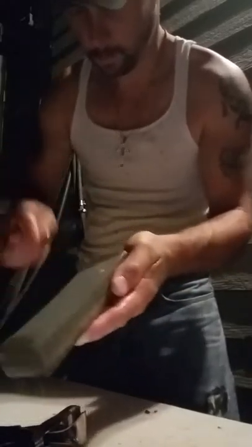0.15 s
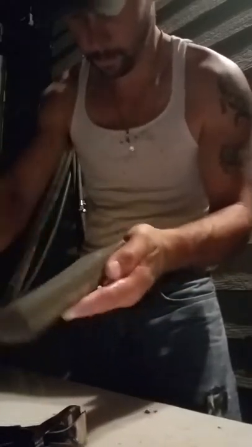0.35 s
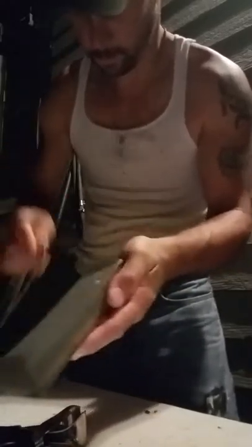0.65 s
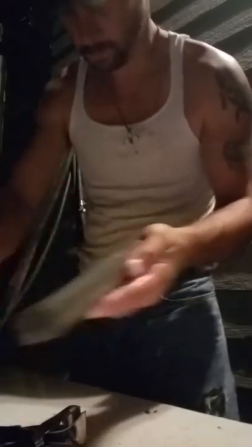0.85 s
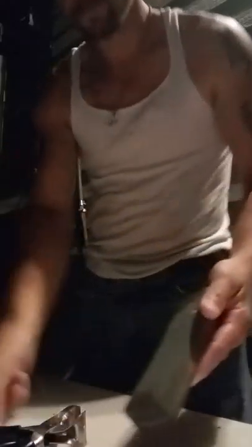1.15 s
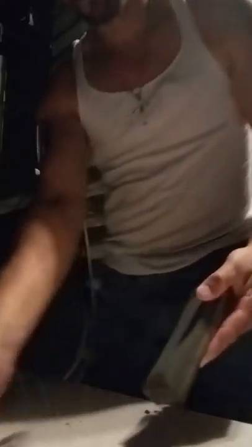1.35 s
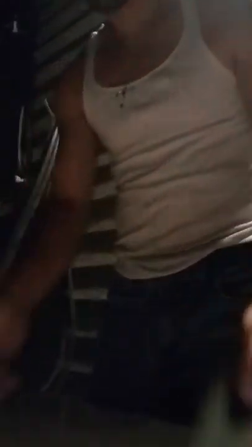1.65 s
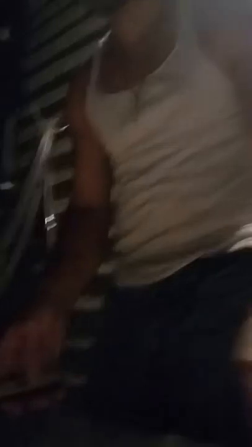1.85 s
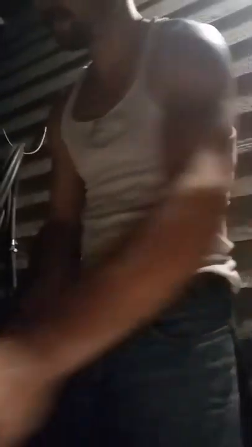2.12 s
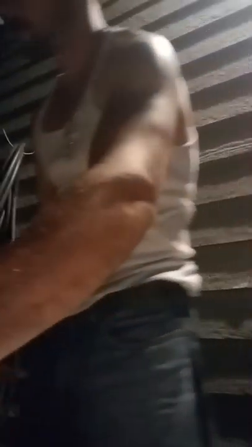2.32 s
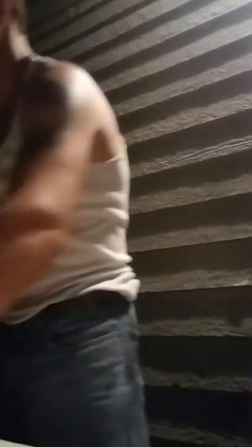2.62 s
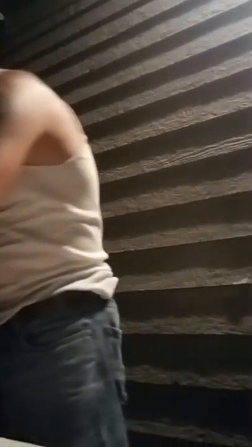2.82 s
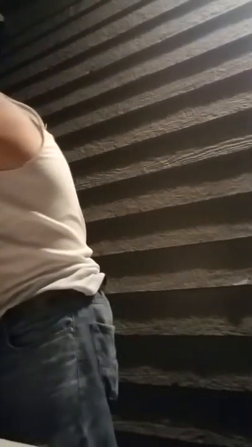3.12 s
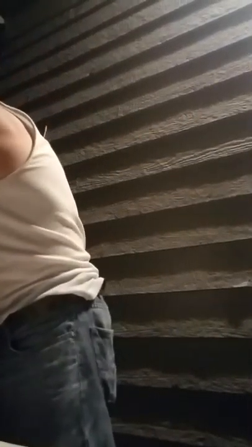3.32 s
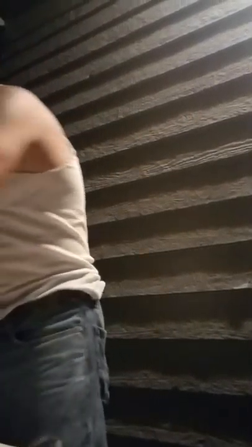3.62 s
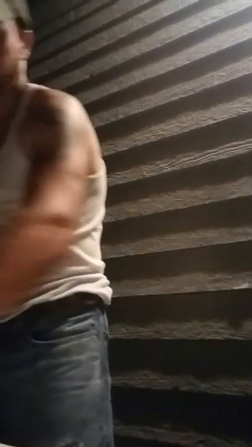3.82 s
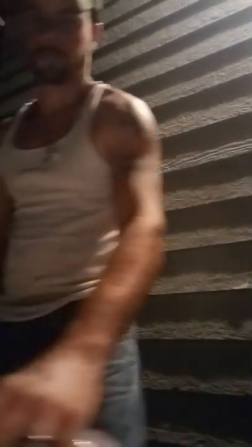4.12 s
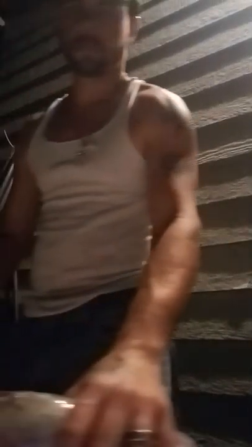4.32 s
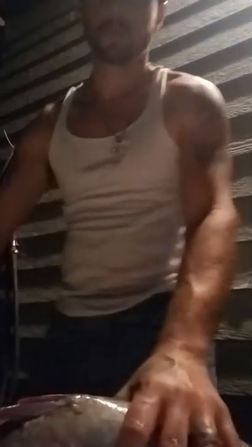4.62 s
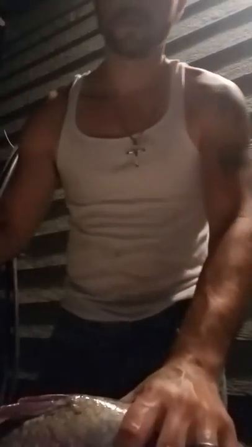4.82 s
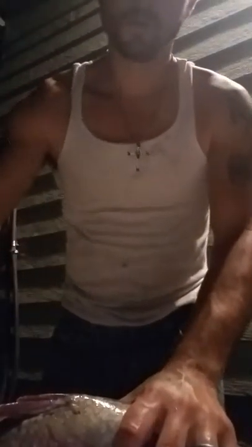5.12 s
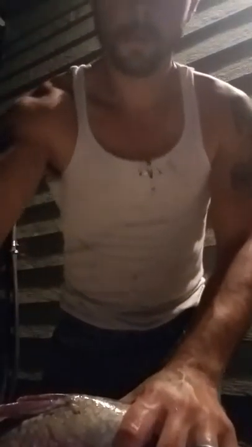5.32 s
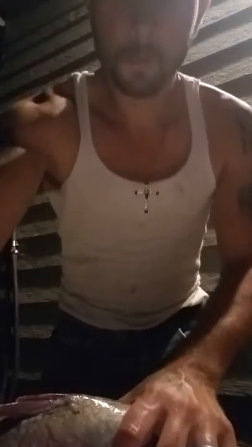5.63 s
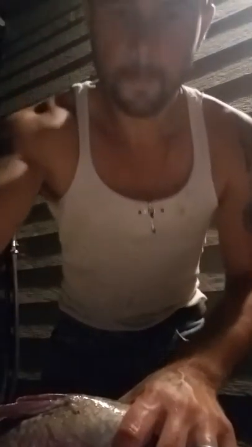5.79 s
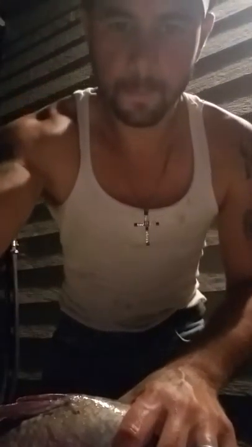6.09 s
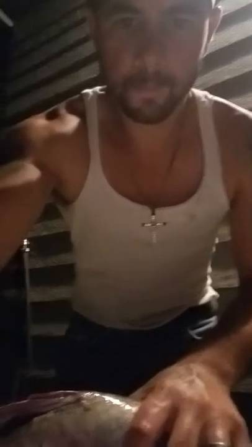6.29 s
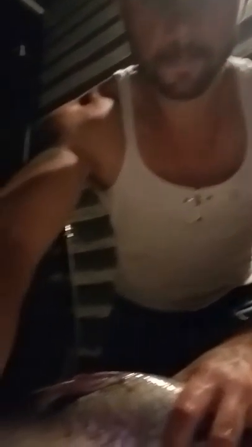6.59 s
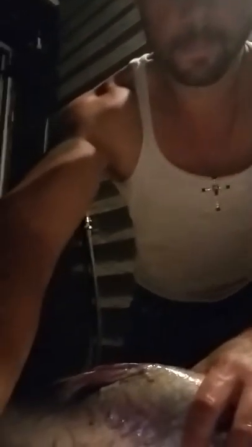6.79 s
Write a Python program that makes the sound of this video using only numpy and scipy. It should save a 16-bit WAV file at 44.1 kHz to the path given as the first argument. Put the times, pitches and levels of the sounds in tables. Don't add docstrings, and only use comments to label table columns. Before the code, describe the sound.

A porch at night, heard by a phone close to the action, mostly to its right, with dense shimmering insects over a low far machine hum. At about 0.1, 0.4, 0.6 and 0.9 s a knife takes four quick gritty strokes on a stone, each with a sharp landing and a steely hiss, the later ones louder. From 1.2 to 2.0 s knife and stone drop on a hollow plastic table: booming knocks, strongest near 1.5, 1.75 and 1.9, with rattles, hard ticks and short ringing skids. The insects duck, then recover by 3. From 2.4 to 3.3 a plastic lid shudders, scrapes and hums, crackling. A soft knock at 3.5; from 3.6 to 4.5 a wet fish drags raspily in jerks, snapping around 4.0 to 4.3. A loud slap at 4.78 rattles briefly. The night dips, then swells; faint wet finger ticks, sliding palms and small clicks near 6.5 end it at 7.

```python
import sys
import numpy as np
from scipy import signal
from scipy.fft import rfft, irfft, next_fast_len
from scipy.io import wavfile
from scipy.ndimage import uniform_filter1d, map_coordinates

SR = 44100
rng = np.random.default_rng(int(sys.argv[2]) if len(sys.argv) > 2 else 0)


def boost_factor(decibels):
    exponent = np.asarray(decibels, float) / 20
    return 10 ** exponent


def int16_out(signal):
    q = np.round(np.clip(np.atleast_2d(signal).T, -1, 1) * 32767)
    wavfile.write(sys.argv[1], SR, q.astype(np.int16))


N = 306495

# t/s, level/dB
NIGHT_LEVEL = [(0, -45.5), (.75, -42.5), (.95, -45.5), (1.45, -45.5), (1.9, -55.5), (2.4, -56.5),
               (2.75, -49), (2.95, -39.5), (4.7, -39), (4.99, -48), (5.2, -50), (5.6, -43.5), (5.9, -41.5),
               (6.58, -38.5), (6.95, -40)]
# f/Hz, density/dB per Hz
CHORUS_COLOUR = [(410, -17.5), (800, -4), (1210, -7), (1640, -11.5), (2350, 0.5), (2650, -6.5),
                 (3130, -1.5), (3690, -15.5), (4660, -9), (5600, -11.5), (7280, -39), (12300, -120)]
# f/Hz, density/dB per Hz
TRILL_COLOUR = [(3240, -44), (5500, -34), (5830, -11.5), (6150, -3.5), (6430, 7), (6720, -1), (7130, -20),
                (7290, -18.5), (8870, -17.5), (10300, -30.5), (15200, -21.5), (16000, -13)]
# f/Hz, density/dB per Hz
HUM_COLOUR = [(15, -50), (35, -22), (54, 9), (124, 2), (199, -6.5), (300, -3), (387, -9), (514, -5),
              (632, -13.5), (1100, -28.5), (2420, -100)]
# f/Hz, likeness/0..1
NIGHT_ALIKE = [(60, 0.97), (600, 0.99), (1000, 0.59), (1400, .03)]
NEAR_ALIKE = [(35, 0.84), (80, 0.75), (250, 0.84), (500, 0.54), (1000, 0.14), (2000, 0.019)]
# f/Hz, level/dB
NIGHT_SIDE = [(100, -0.5), (400, -3), (1800, -5), (3500, -3.5), (5000, -5), (6500, -7.5), (8500, -13.5),
              (11000, 4), (15000, -7.5)]
NEAR_SIDE = [(100, -2.5), (200, -5.5), (400, -9), (800, -7.5), (1500, -13), (3500, -7.5), (6500, -12.5),
             (8500, -21), (11000, -3.5), (15000, -14)]
BLADE_SIDE = [(800, -11), (1500, 3), (3500, -3.5), (6500, -5.5), (8500, -13.5), (11000, -1.5), (15000, -14)]
# f/Hz, t60/s
PORCH_DECAY = [(200, 0.38), (2000, 0.024), (10000, 0.038)]
# f/Hz, width/Hz, level/dB
HOUSING = [(7970, 390, 16), (15300, 1700, -11)]

# t/s, length/s, level/dB, swell/dB, sizzle at top speed/dB
STROKES = [
    (0.112, 0.089, -39.5, -1.5, 3),
    (0.371, 0.061, -39, 2.5, 13),
    (0.625, 0.081, -34, -4, -23),
    (0.871, 0.034, -31.5, 7, 9),
]
# t/s, peak/dB, brightness/dB, ring f/Hz
TOUCHES = [
    (0.1145, -16, -4, 3710),
    (0.3745, -15.5, 5, 2740),
    (0.626, -15.5, 3, 4200),
    (0.868, -13, 0, 3680),
]
# f/Hz, density/dB per Hz
BLADE_COLOUR = [(350, -28), (900, -17.5), (1400, -22), (2500, -16.5), (3300, -5), (5120, -8.5),
                (6200, -1.5), (7310, -10), (8390, 2.5), (10700, -8), (12500, -9), (14900, -8.5),
                (16000, -2.5)]
# f/Hz, width/Hz, level/dB
STEEL = [(4200, 61, -10), (5760, 18, -4), (8200, 47, -14), (11340, 40, 3), (15460, 290, 13)]
STROKE_BANDS = [0, -1, 0, 0]
SIZZLE_SHARE = np.array([0.25, 0.1, 0.21, 1.0])

# t/s, length/s, boom/dB, sag/dB, step a band up/dB
RATTLES = [(1.166, 0.11, -40, -2.5, -7), (1.285, 0.033, -20.5, -2, -15), (1.314, 0.059, -21.5, -10, -10),
           (1.499, 0.077, -10, -12.5, -11.5), (1.571, 0.12, -22.5, -12, -6),
           (1.69, 0.039, -31.5, -3, -12.5), (1.751, 0.093, -19.5, -27, -9), (1.772, 0.022, -28.5, 2, -4),
           (1.808, 0.038, -32, -3.5, -5), (1.911, 0.01, -12.5, -25, -7),
           (1.932, 0.052, -10.5, -13.5, -12.5), (2.0, 0.031, -29, -15, -7), (3.495, 0.027, -23, -2, -11.5),
           (3.52, 0.15, -27.5, -18, -24), (4.779, 0.054, -15, -20, -5.5), (4.846, 0.035, -19, -2.5, -10),
           (4.901, 0.014, -22.5, -4, -8.5)]
# t/s, peak/dB, own ring f/Hz
THUDS = [(1.177, -8, 102), (1.282, -3.5, 138), (1.313, -0.5, 167), (1.4975, 1, 240), (1.502, -4, 150),
         (1.506, -7, 314), (1.536, -2, 425), (1.566, -8, 318), (1.749, 3, 157), (1.774, -10, 241),
         (1.846, -6, 100), (1.91, 6.5, 161), (1.93, -1, 164), (1.947, -1, 199), (1.96, -4, 150),
         (1.984, -9, 176), (2.307, -24, 105), (2.333, -15, 103), (3.493, -10.5, 190), (3.5, -14, 450),
         (3.515, -15, 172), (3.53, -11, 120), (3.555, -14, 86), (4.215, -15, 215), (4.319, -15, 187),
         (4.779, 3.5, 702), (4.786, -7, 566), (4.794, -9, 150), (4.803, -10, 131), (4.812, -14, 180),
         (4.833, -10, 110), (4.845, -7, 474), (4.864, -15, 275), (4.9, -11, 320), (4.925, -16, 200),
         (4.947, -17.5, 149)]
# t/s, peak/dB, brightness/dB, ring f/Hz
TICKS = [(1.3142, -30.5, -65, 1580), (1.4998, -7, -6, 2600), (1.5062, -17, 0, 2460),
         (1.533, -35, -10, 2550), (1.5385, -13, -7, 2500), (1.5672, -21, 3, 1620), (1.582, -36, -12, 1500),
         (1.592, -24, -3, 1530), (1.6225, -33, -1, 3100), (1.737, -38, 8, 1900), (1.299, -38, 8, 1500),
         (1.7505, -21, -13, 1780), (1.7715, -35, -8, 2710), (1.799, -24, -12, 2200), (1.808, -31, 0, 2800),
         (1.8427, -22, -9, 1500), (1.9098, -10, -23, 1850), (1.932, -16, -8, 2960),
         (1.9383, -11.5, -16, 2400), (1.951, -26, -12, 2500), (1.9728, -14, 0, 1930),
         (1.983, -22, -7, 2600), (1.9845, -21.5, 8, 2600), (2.0015, -20.5, -9, 2500),
         (2.005, -22, -10.5, 2400), (2.0275, -25, -4, 2400), (2.031, -20, -4, 2470),
         (2.0375, -19, -15, 2550), (2.3063, -32, -8, 2240), (2.3393, -18.5, -1.5, 2560)]
# f/Hz, density/dB per Hz
TABLE_COLOUR = [(18, -47), (30, -12), (81, -1), (162, -4.5), (229, -3.5), (421, -7), (1770, -12.5),
                (2200, -39), (4840, -95)]
# f/Hz, width/Hz, level/dB
HOLLOW = [(69, 30, 0), (146, 120, -4.5), (240, 38, -2.5), (307, 30, 0.5), (450, 61, 0.5), (583, 58, -3),
          (730, 280, -17)]
# f/Hz, density/dB per Hz
SKID_COLOUR = [(1240, -41), (2100, -3.5), (2580, 5), (3210, -6.5), (3500, -9.5), (4720, 0), (5580, -24),
               (8210, -17), (11000, -46), (15000, -33)]
# f/Hz, width/Hz, level/dB
BLADE_FLAT = [(2770, 37, -14.5), (3260, 220, 0)]
# t/s, f/Hz, level/dB
BLADE_SONG = [
    [(1.5, 3000, -47), (1.54, 3100, -46), (1.6, 3200, -44.5), (1.66, 3250, -46), (1.7, 3250, -67)],
    [(1.57, 1500, -47), (1.61, 1530, -36), (1.64, 1530, -60), (1.7, 1500, -57)],
    [(1.765, 2750, -57), (1.785, 2750, -35), (1.805, 2750, -50), (1.815, 2750, -39), (1.845, 2750, -59)],
]
# f/Hz, level/dB, t60/s
TIP = [(3710, 2, 0.013), (5880, -12, 0.018), (8040, -26, .014), (12000, -21, 0.01)]
# t/s, level/dB
TIP_TAPS = [
    (1.8427, -7),
    (1.845, -8),
]
# t/s, drone/dB
SHIFT = [
    (5.15, -76),
    (5.4, -78),
    (5.41, -91),
    (5.57, -54),
    (6.834, -52.5),
    (6.95, -66),
]
BAND_STEP, BAND_SAG = [0, 0.8, 2.1, 3.4], [0.67, 0.87, 0.85, 0.68]
FLASH_DB = [0, 4, 6, 12]

# t/s, pressure/dB, speed/dB (faster is brighter)
LID_PUSH = [
    (2.36, -54, -6),
    (2.464, -39, 1),
    (2.532, -40, -3),
    (2.6, -35, 1.5),
    (2.872, -29.5, -1),
    (3.0, -32, 1),
    (3.094, -28, 3),
    (3.2, -35.5, -9.5),
    (3.34, -53.5, -4),
]
# f/Hz, density/dB per Hz
LID_COLOUR = [(29, -51), (50, -22), (159, 0), (306, -5.5), (997, -8), (2060, -12.5), (2490, -9.5),
              (3950, -19.5), (5530, -15), (7210, -28), (8340, -22), (10600, -48), (16000, -43)]
# level/dB, growth with pressure, growth with speed
LID_BANDS = [(4, 1.28, -0.85), (-1, 1.24, -0.3), (-8.5, 0.86, 0.46), (-17, 0.6, 1.6)]
# f/Hz, width/Hz, level/dB
RIM = [(2450, 100, 0), (3180, 240, -6)]
# t/s, f/Hz, level/dB
RIM_SONG = [
    [(2.44, 2500, -54), (2.5, 2500, -45), (2.68, 2580, -36), (2.76, 2446, -35.5), (2.8, 2488, -48),
     (2.88, 2563, -30), (2.95, 2450, -34), (3.0, 2502, -50)],
    [(2.55, 3260, -52), (2.67, 3250, -40.5), (2.75, 3260, -39), (2.85, 3250, -62), (2.98, 3000, -52),
     (3.06, 2976, -32.5), (3.12, 2730, -41), (3.23, 2970, -42), (3.28, 3000, -57)],
]
# t/s, f/Hz, level/dB
LID_AIR = [
    (2.38, 323.2, -38),
    (2.474, 326.3, -25),
    (2.548, 292.2, -30.5),
    (2.712, 271, -23),
    (3.028, 266, -45),
    (3.074, 259.7, -20),
    (3.216, 263, -35),
    (3.3, 236, -40),
]
# t/s, peak/dB, brightness/dB, ring f/Hz
CRACKLE = [(2.4453, -33, -1, 2370), (2.5646, -28, -3, 2440), (2.6389, -32, -6, 2520),
           (2.6614, -23, -3, 4900), (2.7038, -29, 0, 4600), (2.745, -22, -5, 3194), (2.76, -25, 0, 5000),
           (2.887, -25, -1, 4100), (2.9377, -25, 0, 5200), (2.9826, -20, 0, 2973), (3.0111, -27, -3, 3000),
           (3.147, -25, -1, 4040), (3.2121, -27, -2, 2993), (3.7191, -29, 0, 4200), (3.7595, -37, -3, 4200),
           (3.7819, -37, 0, 4200), (4.4988, -32, 0, 4200)]

# t/s, pull/dB, speed/dB (faster is brighter)
FISH_PULL = [
    (3.6, -42, -7.5),
    (3.8, -38, 7.5),
    (3.96, -28.5, 4),
    (4.04, -30, 6),
    (4.092, -27, 1),
    (4.2, -28.5, -4),
    (4.225, -27.5, -3.5),
    (4.45, -32.5, -2),
    (4.77, -55, -9.5),
]
# f/Hz, density/dB per Hz
FISH_COLOUR = [(29, -41), (50, -13), (138, -7), (198, 6.5), (246, -9.5), (345, -4), (729, -25),
               (1580, -23.5), (2110, -24.5), (4140, 0), (5670, -8.5), (8140, -0.5), (10900, -21),
               (16000, -9)]
# level/dB, growth with pull, growth with speed
FISH_BANDS = [(-9, 0.68, -1.4), (-3.5, 0.75, 0.19), (-9.5, 2, 0.67), (-11.5, 1.3, 0.69)]
# t/s, length/s, level/dB, sag/dB, step a band up/dB
JERKS = [
    (3.951, 0.036, -39, 5, -6),
    (4.075, 0.043, -38.5, -4, 1.5),
    (4.157, 0.0086, -40, -5, 1),
    (4.216, 0.018, -25.5, -6, -5.5),
    (4.238, 0.011, -39, -4, -10),
    (4.262, 0.017, -34, 0, -2),
    (4.321, 0.0081, -28, 1, -3.5),
]
# t/s, peak/dB, brightness/dB, ring f/Hz
CATCHES = [(3.9505, -14.5, -3.5, 1843), (4.0746, -19, -16, 4100), (4.1571, -10.5, -1, 2562),
           (4.2166, -7.5, -6.5, 3900), (4.2385, -10, -20, 1500), (4.2815, -24, -3, 2600),
           (4.3206, -8.5, -12, 3540), (4.3235, -15, -18, 2900), (3.4955, -28, -42, 800),
           (3.575, -32, 2, 3000), (4.779, -2, -5, 990), (4.783, -13, -10, 1730), (4.859, -28, -47, 3020),
           (4.9008, -23.5, -55, 3220), (4.904, -24, -55, 3180), (6.3976, -25, 0, 2500),
           (6.4662, -26, -43, 2320), (6.4854, -19, -22, 2580), (6.513, -28, -30, 2380),
           (6.541, -25, -25, 1500), (6.5523, -23.5, -19, 1300), (6.592, -27, -25, 2300)]
# t/s, f/Hz, level/dB
SCALE_SONG = [
    (3.9, 4300, -48),
    (3.97, 4090, -37),
    (4.02, 4200, -51),
    (4.07, 4200, -40),
    (4.085, 4200, -30.5),
    (4.14, 4300, -32.5),
    (4.17, 4200, -55),
    (4.27, 3900, -51),
    (4.37, 4110, -42),
    (4.45, 4000, -53),
]
# t/s, f/Hz, level/dB
FISH_AIR = [(3.65, 1587, -41), (3.89, 1580, -29), (3.96, 1600, -17), (3.985, 1600, -38),
            (4.02, 1550, -20.5), (4.07, 1450, -29), (4.1, 1557, -22), (4.17, 1525, -21.5), (4.2, 1500, -37),
            (4.225, 1490, -19), (4.29, 1500, -21), (4.31, 1450, -31), (4.4, 1450, -33), (4.6, 1570, -50)]
# t/s, level/dB
PALMS = [
    [(4.93, -64), (5.06, -58), (5.3, -60), (5.55, -51.5), (5.9, -50.5), (5.95, -66)],
    [(6.3, -50.5), (6.5, -46), (6.62, -60)],
]
# f/Hz, level/dB, t60/s
DRIP = [(1690, 6, 0.024), (3400, 6, 0.021), (4050, -2, .012)]
# t/s, level/dB
DRIPS = [
    (5.19, -47),
    (5.219, -44),
    (5.243, -41),
]


def unit(x):
    return x / np.sqrt(np.mean(x ** 2) + 1e-20)


def along(points, hz):
    f, v = np.transpose(points)
    return np.interp(np.log(hz + 1), np.log(f + 1), v)


def gains(tables):
    t, total = np.arange(N) / SR, 0
    for rows in tables:
        s, *columns = np.transpose(rows)
        total = total + np.array([boost_factor(np.interp(t, s, c, left=-150, right=-150)) for c in columns])
    return total


def wobble(rate):
    knots = rng.standard_normal(int(N * rate / SR) + 4)
    return map_coordinates(knots, [np.arange(N) * rate / SR])


def filtered(x, response):
    m = next_fast_len(N + 8192)
    return irfft(rfft(x, m) * response(np.fft.rfftfreq(m, 1 / SR)), m)[..., :N]


def ports(pair, alike, side_db):
    def mix(hz):
        c, left = np.clip(along(alike, hz), 0, 1), boost_factor(along(side_db, hz))
        scale = 2 / np.sqrt(left ** 2 + 1 + 2 * c * left)
        to_left = [c * left, np.sqrt(1 - c * c) * left]
        to_right = [c * 0 + 1, c * 0]
        return np.array([to_left, to_right]) * scale
    return filtered(pair[None], mix).sum(axis=1)


def night():
    def layer(colour):
        return unit(filtered(rng.standard_normal((2, N)), lambda hz: boost_factor(along(colour, hz))))

    level = gains([NIGHT_LEVEL])[0]
    low, high, hum = layer(CHORUS_COLOUR), layer(TRILL_COLOUR), layer(HUM_COLOUR)
    shimmer = boost_factor(-1.03 + 1.53 * wobble(23))
    insects = boost_factor(-3.5) * low + shimmer * high
    return ports(level * (insects + boost_factor(1.5) * hum), NIGHT_ALIKE, NIGHT_SIDE)


def tail(seconds, t60_share):
    hz, t, z = signal.stft(rng.standard_normal((2, int(seconds * SR))), SR, nperseg=128)
    decay = boost_factor(-60 * t / (t60_share * along(PORCH_DECAY, hz)[:, None]))
    echo = signal.istft(z * decay, SR, nperseg=128)[1]
    return echo / np.linalg.norm(echo, axis=1, keepdims=True)


def placed(x, side_db, wet_db):
    def scatter(hz, knots):
        delay = 0.0001 + 0.0004 * np.abs(np.interp(hz, np.linspace(0, SR / 2, knots.size), knots))
        return np.exp(-2j * np.pi * np.cumsum(delay) * hz[1])

    def echoed():
        return signal.fftconvolve(np.pad(x, (200, 0))[None], tail(0.38, 0.58), axes=1)[:, :N]

    knots = rng.standard_normal((2, 90))
    paths = filtered(x, lambda hz: np.array([scatter(hz, k) for k in knots]))
    sway = 2.85 * wobble(40)
    scattered = np.cos(sway) * paths[0] + np.sin(sway) * paths[1]
    here, there = echoed(), echoed()
    drift = 2.6 * wobble(12)
    echo = np.cos(drift) * here + np.sin(drift) * there
    pair = np.array([x, scattered]) + boost_factor(wet_db) * echo
    return ports(pair, NEAR_ALIKE, side_db)


def resonances(peaks, f):
    total = 0
    for k, (centre, width, db) in enumerate(peaks):
        mode = 1j * f * width / (centre * centre - f * f + 1j * f * width)
        total = total + (-1) ** k * boost_factor(db) * mode
    return total


def friction(tables, colour, edges_hz, grains, spread_db, smooth, slip_rate, slip_db, patchy_db):
    caught = (rng.random(N) < grains / SR) * boost_factor(spread_db * rng.exponential(size=N)) * rng.standard_normal(N)
    rub = (unit(caught) + smooth * rng.standard_normal(N)) * boost_factor(slip_db * wobble(slip_rate))
    z = signal.stft(rub, nperseg=256)[2]
    streaks = uniform_filter1d(rng.standard_normal(z.shape), size=3, axis=0)
    streaks = uniform_filter1d(streaks, size=8, axis=1)
    rub = signal.istft(z * boost_factor(patchy_db * unit(streaks)), nperseg=256)[1][:N]

    def above(hz, edge):
        return 1 / (1 + (edge / (hz + 1)) ** 8)

    def split(hz):
        return colour(hz) * np.array([above(hz, low) - above(hz, high) for low, high in edges_hz])

    return sum(gain * unit(band) for gain, band in zip(gains(tables), filtered(rub, split)))


def clicks(rows, crack_s, ring_s, ring_db):
    dull, bright, t = np.zeros(N + SR), np.zeros(N + SR), np.arange(SR // 20) / SR
    fade = boost_factor(-60 * t / crack_s)
    for (s, db, bright_db, hz), noise in zip(rows, rng.standard_normal((len(rows), 2, len(t)))):
        start = round(s * SR)
        burst = noise * fade
        crack = boost_factor(db - 12.5) * burst * np.linalg.norm(fade) / np.linalg.norm(burst, axis=1, keepdims=True)
        ring = boost_factor(db + ring_db - 0.38 * bright_db - 60 * t / ring_s) * np.sin(2 * np.pi * hz * t)
        dull[start:][:len(t)] += 3.9 * crack[0] + ring
        bright[start:][:len(t)] += boost_factor(bright_db) * crack[1]
    knock = signal.sosfilt(signal.butter(2, [700, 4300], "band", fs=SR, output="sos"), dull)
    snap = signal.sosfilt(signal.butter(1, [4800, 9500], "band", fs=SR, output="sos"), 1.6 * bright)
    port_ring = filtered(bright[:N], lambda hz: resonances(HOUSING, hz))
    return knock[:N] + snap[:N] + port_ring


def strokes():
    fastest = 0.6
    lift_s, lift_db = 0.046, -44
    for s, length, db, swell_db, sizzle_db in STROKES:
        start = db + np.array(STROKE_BANDS)
        fast = start + fastest * swell_db + sizzle_db * SIZZLE_SHARE
        end = start + swell_db
        yield [(s, *start), (s + fastest * length, *fast), (s + length, *end),
               (s + length + lift_s, *(end + lift_db))]


def knife():
    def steel(hz):
        return boost_factor(along(BLADE_COLOUR, hz)) * (0.41 + np.abs(resonances(STEEL, hz)))

    edges_hz = [(650, 5250), (5100, 8800), (7200, 15400), (11000, 25000)]
    rasp = friction(strokes(), steel, edges_hz, grains=9000, spread_db=1.0, smooth=0.36,
                    slip_rate=400, slip_db=3.2, patchy_db=3.2)
    t = np.arange(N) / SR
    speed = 1
    for s, *_ in TOUCHES:
        speed = speed - 0.28 * (t > s) * np.exp(-np.abs(t - s) / 0.009)
    return boost_factor(0.86) * speed * rasp + boost_factor(0.5) * clicks(TOUCHES, 0.007, 0.031, -13)


def rattles(rows):
    rise_s, rise_db, flash_s, settle_s, settle_db = 0.002, -24, 0.01, 0.03, -26
    for s, length, db, sag_db, step_db in rows:
        start = db + step_db * np.array(BAND_STEP)
        end = start + sag_db * np.array(BAND_SAG)
        first = start - sag_db / 20 * np.array(FLASH_DB)
        yield [(s - rise_s, *(first + rise_db)), (s, *first), (s + min(flash_s, length / 2), *start),
               (s + length, *end), (s + length + settle_s, *(end + settle_db))]


def pocket(rows, width_hz, slip_rate, slip_db):
    s, hz, db = np.transpose(rows)
    t = np.arange(N) / SR
    slow = filtered(rng.standard_normal((2, N)), lambda f: 1 / (1 + (2 * f / width_hz) ** 2))
    phase = 2 * np.pi * np.cumsum(np.interp(t, s, hz)) / SR
    tone = slow[0] * np.cos(phase) + slow[1] * np.sin(phase)
    ring = unit(tone * boost_factor(slip_db * wobble(slip_rate)))
    return boost_factor(np.interp(t, s, db, left=-150, right=-150)) * ring


def taps(rows, modes, attack_s):
    total = 0
    for s, db in rows:
        t = np.clip(np.arange(N) / SR - s, 0, None)
        attack = 1 - np.exp(-t / attack_s)
        for hz, level, t60 in modes:
            total = total + attack * boost_factor(db + level - 60 * t / t60) * np.sin(2 * np.pi * hz * t)
    return total


def blade():
    return taps(TIP_TAPS, TIP, 0.0032) + sum(pocket(rows, 160, 60.2, 2) for rows in BLADE_SONG)


def thuds():
    blows, own, t = np.zeros(N), np.zeros(N + SR), np.arange(SR // 8) / SR
    for s, db, hz in THUDS:
        start = round((s + 0.0015) * SR)
        blows[start:][:24] = boost_factor(db) * np.hanning(24)
        own[start:][:len(t)] += boost_factor(db - 8 - 60 * t / 0.048) * np.sin(2 * np.pi * hz * t)
    return boost_factor(-9) * filtered(blows, lambda hz: resonances(HOLLOW, hz)) + own[:N]


def table():
    def top(hz):
        hollow = boost_factor(along(TABLE_COLOUR, hz)) * (0.5 + np.abs(resonances(HOLLOW, hz)))
        skid = boost_factor(along(SKID_COLOUR, hz) - 30) * (1 + 2 * np.abs(resonances(BLADE_FLAT, hz)))
        return hollow + skid

    edges_hz = [(75, 470), (500, 1750), (2000, 4050), (7000, 32000)]
    rattle = friction(rattles(RATTLES), top, edges_hz, grains=4000, spread_db=0.44, smooth=0.93,
                      slip_rate=150, slip_db=2.26, patchy_db=3.4)
    shift = friction([SHIFT], top, [(130, 900)], grains=600, spread_db=1.5, smooth=0.9,
                     slip_rate=20, slip_db=3.5, patchy_db=2.5)
    dropped = thuds() + blade() + boost_factor(-2.5) * rattle
    ticks = boost_factor(-1.0) * clicks(TICKS, 0.0085, 0.016, -11.0)
    catches = boost_factor(5.5) * clicks(CATCHES, 0.0034, 0.017, -20.5)
    return dropped + shift + ticks + catches


def pushed(rows, bands):
    top = max(db for s, db, speed in rows)
    moves = []
    for s, db, speed in rows:
        levels = [top + at + grows * (db - top) + leans * speed for at, grows, leans in bands]
        moves.append((s, *levels))
    return [moves]


def lid():
    def box(hz):
        return boost_factor(along(LID_COLOUR, hz)) * (1 + np.abs(resonances(RIM, hz)))

    edges_hz = [(70, 720), (700, 1890), (2000, 5200), (7000, 22000)]
    scrape = friction(pushed(LID_PUSH, LID_BANDS), box, edges_hz, grains=6000, spread_db=0.78, smooth=1.4,
                      slip_rate=80, slip_db=1.2, patchy_db=1.9)
    crackle = clicks(CRACKLE, 0.004, 0.014, -1)
    air = boost_factor(-3.5) * pocket(LID_AIR, 105, 30.64, 0.64)
    song = boost_factor(-1.5) * sum(pocket(rows, 330, 70, 3.9) for rows in RIM_SONG)
    return crackle + boost_factor(-0.5) * scrape + air + song


def fish():
    def skin(hz):
        return boost_factor(along(FISH_COLOUR, hz))

    drag_hz = [(70, 510), (700, 2250), (3000, 5500), (7000, 15500)]
    drag = friction(pushed(FISH_PULL, FISH_BANDS), skin, drag_hz, grains=5000, spread_db=1.0, smooth=0.82,
                    slip_rate=80, slip_db=1.4, patchy_db=2.1)
    jerk_hz = [(150, 660), (900, 2240), (2600, 6400), (7000, 37000)]
    jerks = friction(rattles(JERKS), skin, jerk_hz, grains=5000, spread_db=0.91, smooth=0.74,
                     slip_rate=150, slip_db=0.89, patchy_db=2.2)
    palms = friction(PALMS, skin, [(900, 26000)], grains=2500, spread_db=1.2, smooth=1.2,
                     slip_rate=40, slip_db=2.5, patchy_db=2.5)
    song = pocket(SCALE_SONG, 700, 70, 1.0)
    air = boost_factor(-5.5) * pocket(FISH_AIR, 370, 70, 0.56)
    return boost_factor(-1.0) * drag + jerks + palms + song + air + taps(DRIPS, DRIP, 0.0012)


def scene():
    around = night()
    on_stone = placed(knife(), BLADE_SIDE, -4.5)
    on_table = placed(table() + lid() + fish(), NEAR_SIDE, -12.5)
    return around + on_stone + on_table


def band_limit(x):
    return signal.sosfilt(signal.butter(12, 16810, fs=SR, output="sos"), x)


def record(dry):
    dry = dry / (1 + np.abs(dry / 0.9) ** 6) ** (1 / 6)

    def band(hz):
        bass_cut = (1j * hz / (1j * hz + 35)) ** 2
        treble_cut = np.maximum(1 / (1 + (hz / 15800) ** 300), boost_factor(-40))
        return bass_cut * treble_cut

    return band_limit(filtered(dry, band))


dry = scene()
out = record(dry)
int16_out(out)
```